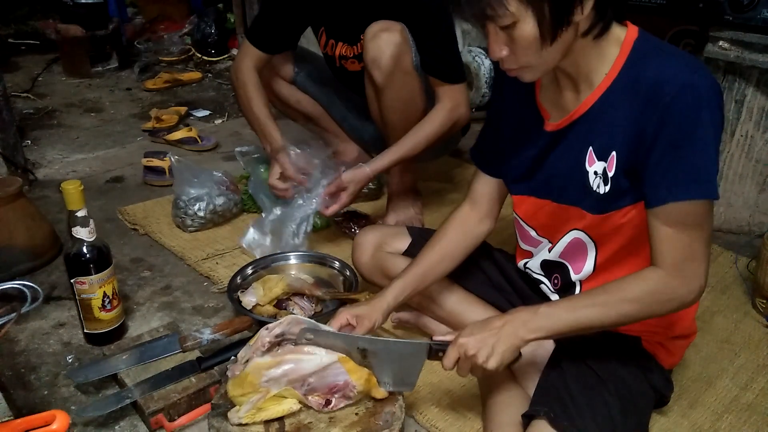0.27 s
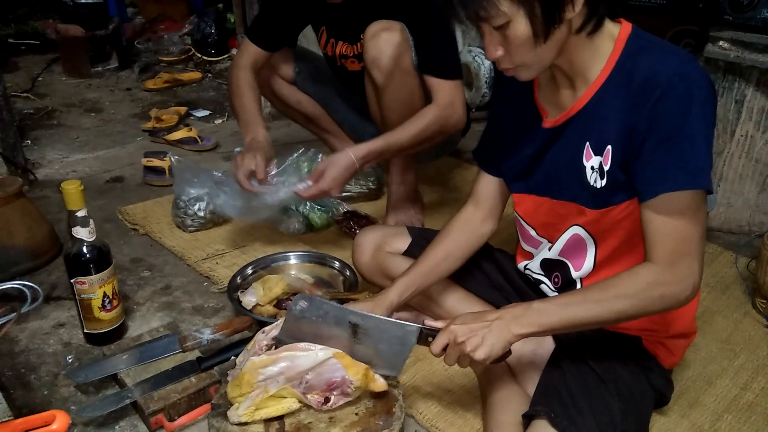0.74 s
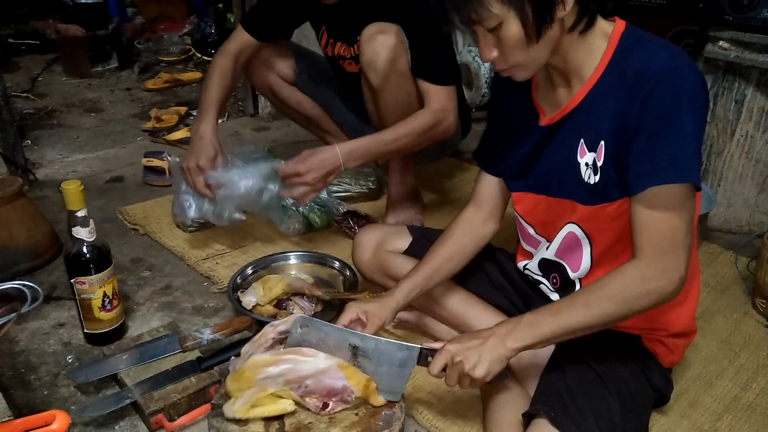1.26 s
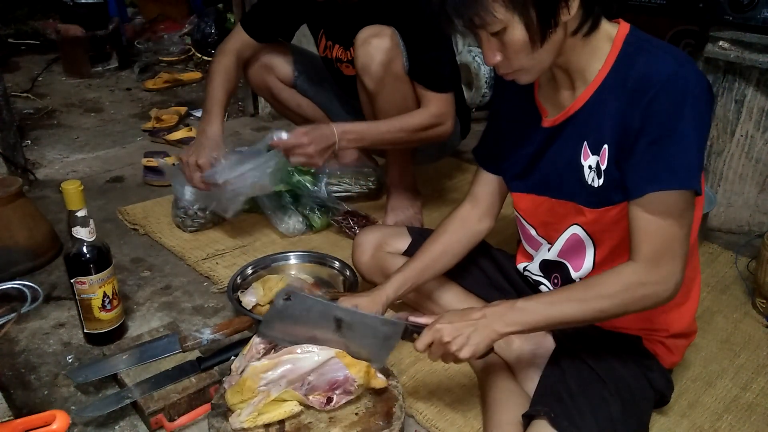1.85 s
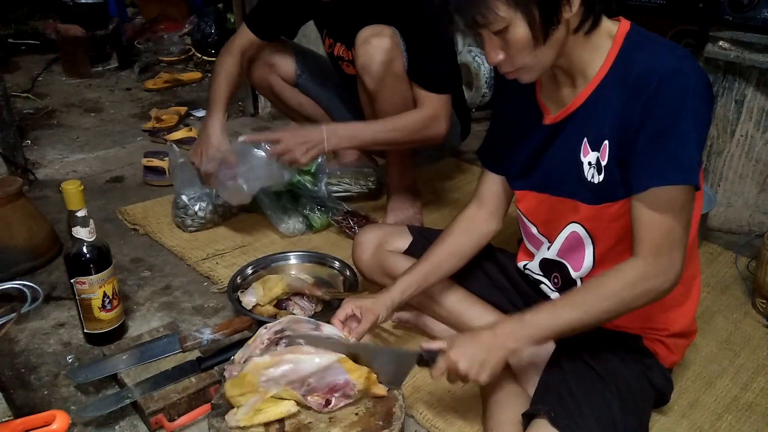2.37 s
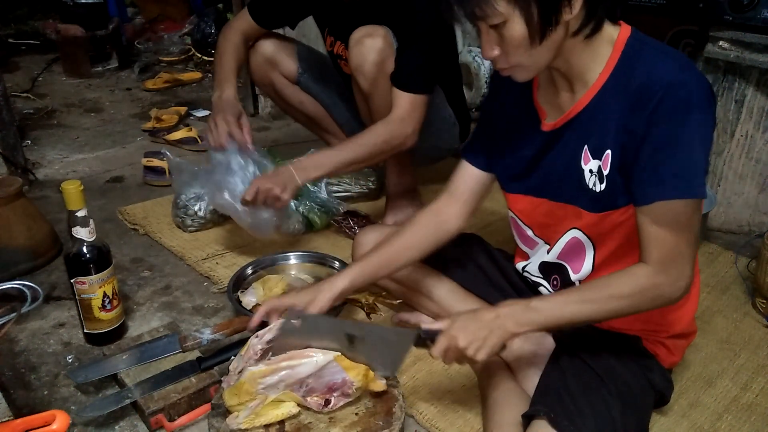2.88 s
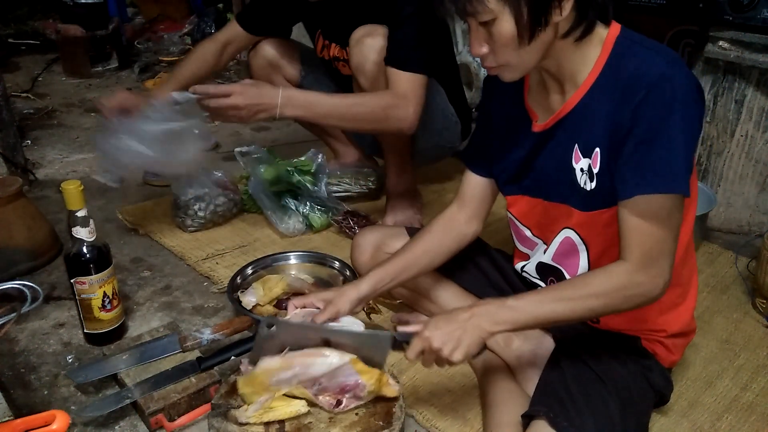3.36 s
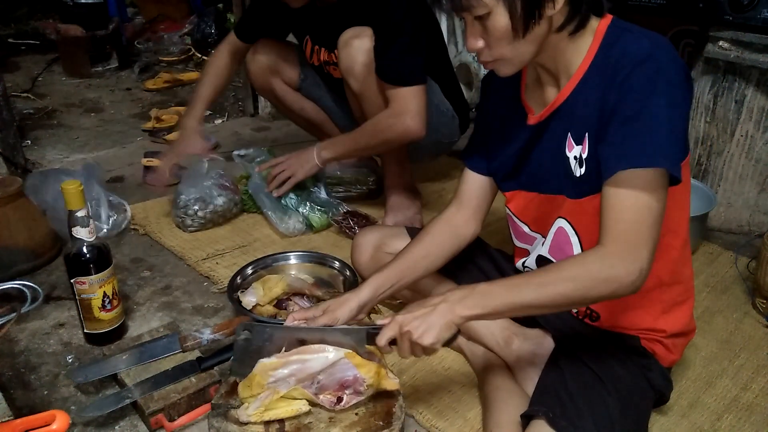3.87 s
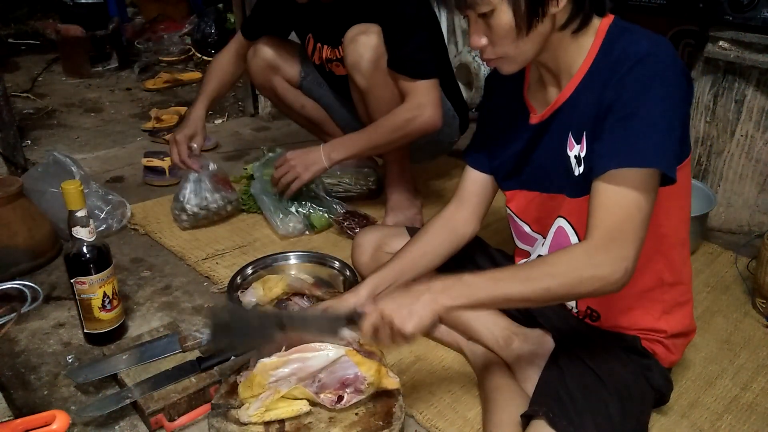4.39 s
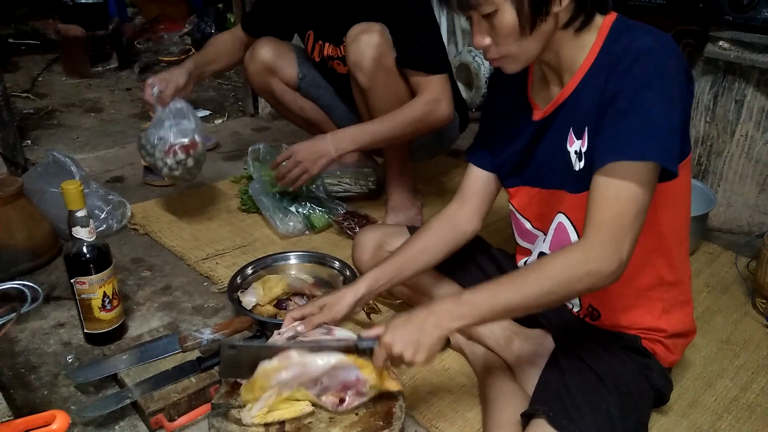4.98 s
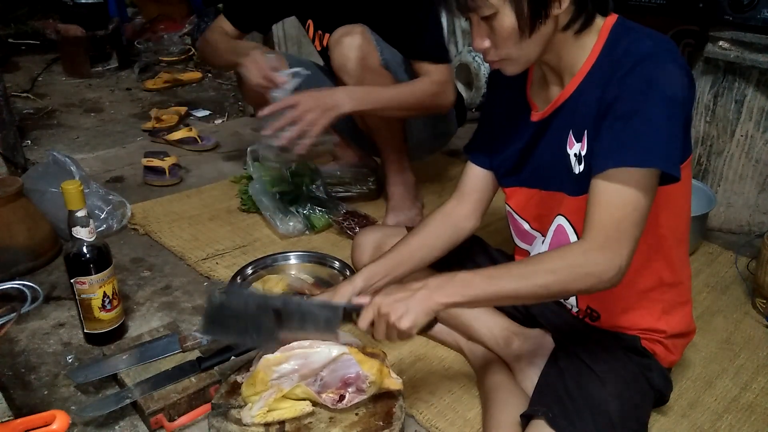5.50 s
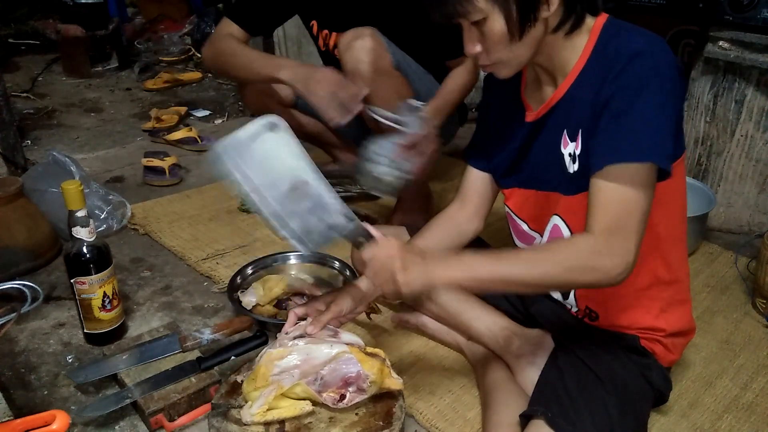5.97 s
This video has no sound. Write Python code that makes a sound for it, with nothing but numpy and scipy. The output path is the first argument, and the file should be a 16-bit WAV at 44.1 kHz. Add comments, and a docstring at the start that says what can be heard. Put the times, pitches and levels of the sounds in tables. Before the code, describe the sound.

A small, hard-walled room with short reflections, soft room tone and a low rumble that swells in over the first second. From 0 s thin plastic bags are pulled and gathered: airy, high hiss with fine crackle, busiest until about 1.1 s, with tiny ticks at 0.15 and 0.3 and soft floor bumps near 0.3. At 1.3 s a cleaver goes through raw chicken into a wooden block: deep thump, bright crack, short woody ring. A sharp little nudge at 2.0 precedes a second, knockier chop at 2.3, with a faint low hum passing until about 3. Bags rustle in brief pulls; a sharp crease ticks at 2.9 and steel clinks faintly at 3.2. Soft bumps come around 4.0. The loudest chop cracks and knocks hard at 4.87, followed by near stillness. Rustling returns from 5.4, with slight shifting at 5.9, then a final crunchy, less weighty double-catching chop at 6.2.

```python
"""In a small hard-walled room, a heavy cleaver chops a raw chicken four times on a wooden block.
Each chop layers a low push through the meat, a crack of skin and bone, and the edge knocking on ringing wood.
Behind it, thin plastic bags are pulled and gathered: dense random snaps make their hiss and crinkle.
Nudges, soft bumps, squeaks, a passing hum and one light clink fill in over low rumble and soft room tone."""
import sys
import numpy as np
from scipy import signal
from scipy.fft import rfft, irfft
from scipy.io import wavfile
from scipy.ndimage import uniform_filter1d

SR = 44100
rng = np.random.default_rng(int(sys.argv[2]) if len(sys.argv) > 2 else 0)


def materialize(psi):
    """Save the field psi as 16-bit PCM at rate SR to the path in sys.argv[1].

    A 1-D psi becomes a single channel; in a 2-D psi each row is a channel.
    """
    bounded = np.clip(np.atleast_2d(psi).T, -1, 1)
    quanta = np.round(bounded * 32767).astype(np.int16)
    wavfile.write(sys.argv[1], SR, quanta)


N = 275251  # length in samples

# Hands pulling or gathering a bag: (start [s], length [s], hiss of sliding film [dB], crumpling [dB])
GRIPS = [(0, 0.47, -53.5, -61.5), (0.526, 0.08, -45, -55), (0.592, 0.068, -43.5, -50.5),
         (0.673, 0.16, -47.5, -57), (0.827, 0.16, -42.5, -52), (0.971, 0.089, -43, -53),
         (1.193, 0.33, -50.5, -61.5), (1.656, 0.072, -53.5, -64), (1.939, .32, -47, -61.5),
         (2.34, 0.13, -51.5, -64.5), (2.741, 0.26, -50, -64), (3.037, 0.38, -52.5, -68.5),
         (3.295, 0.16, -49.5, -80), (3.672, 0.028, -60, -72.5), (3.811, 0.087, -48.5, -60.5),
         (3.92, 0.28, -55, -69), (4.168, 0.11, -47, -54.5), (4.287, 0.077, -47.5, -61.5),
         (4.362, 0.21, -59, -71.5), (5.449, 0.55, -53, -61), (5.879, 0.13, -54.5, -53.5)]
# The film tightens, more slowly in a long pull, then settles when the hand stops.
GRIP_RISE_SHARE, GRIP_RISE_MAX_S, GRIP_RELEASE_S = 0.38, 0.05, 0.027
# Faint rustle between grips, sinking almost to silence after the third chop, then returning:
# (time [s], hiss level [dB])
RUSTLE = [(0, -58.5), (.4, -55), (2.6, -56), (3.42, -63), (3.58, -67), (4.8, -63.5), (5.05, -96.5),
          (5.3, -91), (5.41, -63), (6.2, -64.5)]
RUSTLE_CRUMPLE_DB = -12.5  # its crumpling against its hiss
# Spectrum of film hissing: (frequency [Hz], level [dB])
HISS_SPECTRUM = [(500, -37.5), (2000, -25.5), (4500, -34.5), (6500, -17), (8000, -4), (9400, 2),
                 (10600, 0.5), (12200, -4), (14400, -7)]
# Spectrum of film folding: (frequency [Hz], level [dB])
CRUMPLE_SPECTRUM = [(100, -13.5), (200, -20.5), (290, -6.5), (400, -11.5), (750, -3.5), (1500, -0.5),
                    (2200, -2.5), (3000, -5.5), (4500, -6.5), (7000, -3.5), (14000, -23.5)]
# Single creases snapping above the hiss: (time [s], level [dB])
SNAPS = [(.1502, -22.5), (0.307, -25), (2.8866, -20.5)]

# Spectrum of the low rumble: (frequency [Hz], level [dB])
RUMBLE_SPECTRUM = [(20, -47), (35, -13), (50, 3), (85, -0.5), (120, -8), (180, -25.5), (600, -53)]
RUMBLE_IN_S = 1
# Spectrum of the surroundings: (frequency [Hz], level [dB])
ROOM_TONE_SPECTRUM = [(150, -13.5), (450, -4.5), (800, -3), (1300, -7), (2600, -22.5), (14000, -37)]
ROOM_TONE_DB = -73

# Meat, blade and bags shifted or set down: (time [s], level [dB], length [s], tilt [dB per octave])
NUDGES = [(.063, -55.5, 0.0037, -2), (.09, -61, 0.081, -3), (.3397, -53, 0.016, 2),
          (2.0222, -31.5, 0.0015, 4.5), (2.021, -47, 0.0093, -6.5), (2.9, -56.5, 0.041, 0),
          (3.8255, -52, 0.017, 0.5), (5.918, -48.5, 0.033, -4.5), (5.975, -52.5, 0.057, 2)]
# Spectrum of a nudge: (frequency [Hz], level [dB])
NUDGE_SPECTRUM = [(80, -8.5), (220, -11), (340, -4.5), (480, -15), (900, -2.5), (1500, -3.5), (2400, -6),
                  (5000, -30), (9500, -2.5), (14500, -13.5)]
# Soft bumps through the floor as the two people shift their weight: (time [s], level [dB])
BUMPS = [(0.265, -17), (0.361, -11), (3.979, -16.5), (4.144, -14)]
# Faint brief tones, perhaps squeaks of wet steel and film:
# (time [s], frequency [Hz], level [dB], length [s])
SQUEAKS = [(0.419, 1660, -52, 0.022), (2.531, 975, -69, 0.09), (4.642, 1634, -68.5, .13),
           (5.356, 1700, -74, 0.071)]

# Blows, the last chop catching twice; where the edge lands sets the clack's pitch:
# (time [s], thump into the floor [dB], body of the block [dB], body tilt [dB per octave],
#  knock of the edge [dB], ringing [dB], lead of the thump [s], clack [Hz], clack [dB])
CHOPS = [(1.2918, 10, 4, -9.5, 0.5, -43, 0.0048, 1630, -33),
         (2.296, 11, 5, -3.5, 11.5, -40.5, 0.0038, 1210, -33),
         (4.8693, 13, 20.5, 4, 25, -31, 0.0062, 1349, -15.5),
         (6.2061, -2, -8, -12, 9.5, -47, 0.0062, 1400, -28), (6.211, 1, -7, -17, 3, -44, 0.0066, 1490, -21)]
# Spectrum of a push into the floor: (frequency [Hz], level [dB])
THUMP_SPECTRUM = [(25, -45), (45, -9.5), (60, 0), (115, -0.5), (180, -5.5), (240, -26.5), (500, -40.5),
                  (2000, -72)]
# Spectrum of the block's body: (frequency [Hz], level [dB])
BODY_SPECTRUM = [(60, -37.5), (185, 1), (230, -8), (275, 3.5), (330, -2.5), (385, -17.5), (445, 2),
                 (520, -8.5), (600, 5), (720, -3.5), (1100, -23), (3000, -55.5)]
# Spectrum of the edge on wood: (frequency [Hz], level [dB])
KNOCK_SPECTRUM = [(200, -41), (650, -30), (790, -3.5), (900, 2.5), (1100, -9), (1400, -3), (2050, -9.5),
                  (2600, -30), (4000, -35.5), (14000, -50)]
CLACK_T60_S = 0.018
# Ringing modes of block and blade: (frequency [Hz], relative level [dB], t60 [s])
RING_MODES = [(277, -5, 0.27), (322.5, -7.5, 0.44), (450, -5.5, 0.3), (590, -1.5, 0.22), (755, -2.5, 0.31),
              (904, 8.5, .18), (936, 1.5, 0.18), (1023, -1.5, 0.16), (1234, -4.5, 0.15), (1338, -7.5, 0.15),
              (1398, -6.5, 0.14), (1500, -7.5, 0.13), (1635, -6, .15), (1674, -2, .19), (1806, -4, .12),
              (2087, -3.5, .16)]
BODY_TOP_HZ = 820  # lower modes belong to the mass of the block, higher ones answer the edge
FOCUS_DB, FOCUS_OCTAVES = 8.5, 0.15  # the place of the blow favours the modes near its clack
RING_ROUGH = 0.45  # share of unevenness, as meat and hand press on the ringing parts
# Skin and bone giving way: (time [s], level [dB], length [s], tilt [dB per octave])
CRACKS = [(1.2928, -27, 0.0042, -7), (2.2982, -22.5, 0.0069, -4), (4.8525, -39, 0.012, -9.5),
          (4.8656, -21, 0.0034, -5.5), (6.1915, -45, 0.0086, -4.5), (6.1963, -25.5, 0.0057, -5),
          (6.2005, -34, 0.0031, -7.5), (6.2055, -24.5, 0.011, -6.5)]
# Spectrum of a crack: (frequency [Hz], level [dB])
CRACK_SPECTRUM = [(300, -34), (650, -29.5), (950, -12.5), (1500, -19.5), (3200, -10.5), (4300, -11.5),
                  (6200, -8), (7800, -1.5), (9500, 7), (12000, -0.5), (14500, -5.5)]

HUM_HZ, HUM_DB = 86.3, -60.5
HUM_START_S, HUM_RISE_S, HUM_HOLD_S, HUM_FADE_DB_PER_S = 2.2, 0.12, 0.47, 38
CLINK_S = 3.1995
# Ringing of steel touched lightly once: (frequency [Hz], level [dB], t60 [s])
CLINK_PARTIALS = [(899, -56, .18), (1362, -51.5, .11), (2449, -58, .11)]

# Decay of the room: (frequency [Hz], t60 [s])
ROOM_DECAY = [(60, 0.61), (105, 0.52), (180, 0.31), (800, 0.3), (2000, 0.27), (5000, 0.25), (14000, 0.24)]
# Stereo width of the reflections: (frequency [Hz], side against mid [dB])
WIDTH = [(2700, -78), (4000, -41), (6000, -7), (8000, -2.5), (14000, -2)]
EDGE_HZ = 14350  # top of the final band


def gain(db):
    """Turn decibels into an amplitude factor."""
    return 10 ** (np.asarray(db) / 20)


def evened(x):
    """Scale to unit RMS level."""
    return x / np.sqrt(np.mean(x ** 2) + 1e-20)


def read_curve(points, hz):
    """Join the points with straight lines on a log-frequency axis."""
    f, value = np.transpose(points)
    return np.interp(np.log(hz + 1), np.log(f + 1), value)


def add(mix, s, sound):
    """Lay a sound into the mix at s seconds, cut at the end of the mix."""
    part = mix[round(s * SR):][:len(sound)]
    part += sound[:len(part)]


def pulse(points, tilt_db=0, from_hz=1000, size=8192):
    """The tightest causal click with the given spectrum (minimum phase), tilted above from_hz."""
    hz = np.fft.rfftfreq(size, 1 / SR)
    octaves = np.log2(np.maximum(hz / from_hz, 1))
    cepstrum = irfft(np.log(gain(read_curve(points, hz) + tilt_db * octaves)))
    # folding the cepstrum forward in time gathers the energy at the front
    cepstrum[1:size // 2] *= 2
    cepstrum[size // 2 + 1:] = 0
    return irfft(np.exp(rfft(cepstrum)))[:size // 2]


def unit_pulse(points, tilt_db=0):
    """A pulse scaled to unit energy."""
    click = pulse(points, tilt_db)
    return click / np.linalg.norm(click)


def colour(x, points):
    """Filter a sound to the given spectrum."""
    return signal.oaconvolve(x, pulse(points))[:len(x)]


def smooth(x, first, second):
    """Two moving averages along time, with lengths in samples."""
    return uniform_filter1d(uniform_filter1d(x, first), second)


def wander(size):
    """Slow random drift scaled to unit spread, with bounded swing, smoothed over about size samples."""
    return np.clip(evened(smooth(rng.standard_normal(N), size, size * 2 // 3)), -2, 2)


def ports(mid, side):
    """Two close microphone ports differ only in the treble."""
    return mid + np.array([[1], [-1]]) * colour(side, WIDTH)


def room(x, wet_db, build_s=0.0029):
    """Direct sound plus reflections that thicken quickly, each band dying at its own speed."""
    hz, t, z = signal.stft(rng.choice([-1., 1.], (2, SR // 2)), SR, nperseg=256)
    decay = gain(-60 * t / read_curve(ROOM_DECAY, hz)[:, None])
    tail = signal.istft(z * decay, SR, nperseg=256)[1]
    build = 1 - np.exp(-(np.arange(tail.shape[1]) / SR / build_s) ** 2)
    z = rfft(tail * build)
    # flatten the broad spectrum: the walls favour no band
    window = signal.windows.hann(64)[None]
    z /= np.sqrt(signal.convolve(abs(z) ** 2, window, "same", "direct"))
    keep = SR * 2 // 5
    tail = irfft(z)[:, :keep] * np.sqrt(build[:keep])
    tail /= np.linalg.norm(tail[0])
    mid, side = signal.oaconvolve(x[None], tail, axes=1)[:, :N] * gain(wet_db)
    return ports(x + mid, side)


def moving(x, wet_db, count=10, places_per_s=45):
    """A moving source crossfades through several sets of reflections in turn."""
    place = np.arange(N) / SR * places_per_s
    wet = 0
    for k in range(count):
        share = np.sin(np.pi / 2 * np.minimum((place - k) % count, 2)) ** 2
        wet = wet + room(x * share, wet_db, build_s=0.00083)
    return wet


def bursts(rows, spectrum, fall):
    """Each row is a quick run of tiny ruptures or slips that weakens toward its end."""
    out = np.zeros(N)
    for s, db, length, tilt_db in rows:
        u = np.linspace(0, 1, max(round(length * SR), 8))
        z = rfft(rng.standard_normal(len(u)) * np.exp(-fall * u), 2 * len(u))
        flat = irfft(z / abs(z))[:len(u)]  # the run has no pitch of its own
        run = evened(flat * signal.windows.tukey(len(u), .1))
        add(out, s, gain(db) * np.convolve(run, unit_pulse(spectrum, tilt_db)))
    return out


def grip(start, length):
    """Rise, hold and release of one hand movement."""
    t = np.arange(N) / SR - start
    rise = np.clip(t / min(GRIP_RISE_SHARE * length, GRIP_RISE_MAX_S), 0, 1)
    return rise * np.exp(-np.clip((t - length) / GRIP_RELEASE_S, 0, 20))


def crinkle(spectrum, level_db, per_s, spread_db, clump_db):
    """Thousands of little buckles in plastic film, of uneven size and coming in clumps."""
    size = gain(spread_db * np.minimum(rng.exponential(1, N), 5)) * rng.choice([-1, 1], N)
    happens = rng.random(N) < per_s / SR
    snaps = size * happens * gain(clump_db * wander(size=500))
    return evened(colour(snaps, spectrum)) * gain(level_db)


def facets(x, patch_db=1.65):
    """As the film folds, its facets change size, so its colour shifts in brief patches."""
    z = signal.stft(x, nperseg=256)[2]
    patches = rng.standard_normal(z.shape)
    for _ in range(2):
        patches = uniform_filter1d(patches, size=5, axis=0)  # across frequency
        patches = uniform_filter1d(patches, size=9, axis=1)  # across time
    return signal.istft(z * evened(gain(patch_db * evened(patches))), nperseg=256)[1][:N]


def bags():
    """Film sliding on film hisses; folding it crackles lower down. Every grip drives both."""
    slide = gain(np.interp(np.arange(N) / SR, *np.transpose(RUSTLE))) ** 2  # power
    fold = slide * gain(RUSTLE_CRUMPLE_DB) ** 2
    for start, length, hiss_db, crumple_db in GRIPS:
        power = grip(start, length) ** 2
        slide = slide + power * gain(hiss_db) ** 2
        fold = fold + power * gain(crumple_db) ** 2
    hiss = crinkle(HISS_SPECTRUM, 10 * np.log10(slide), per_s=5500, spread_db=2.8, clump_db=2.3)
    folds = crinkle(CRUMPLE_SPECTRUM, 10 * np.log10(fold), per_s=2000, spread_db=3.0, clump_db=2.0)
    return moving(facets(hiss + folds) + creases(), wet_db=2.5)


def rumble(level_db=-65.0, lump_db=4.2, swell_db=3.0):
    """Low-coloured noise, lumpy from quick and slow drifts in level, that swells in at the start."""
    drift_db = lump_db * wander(size=1500) + swell_db * wander(size=7000)
    noise = evened(colour(rng.standard_normal(N) * gain(drift_db), RUMBLE_SPECTRUM))
    swell_in = np.minimum(np.sqrt(np.arange(N) / SR / RUMBLE_IN_S), 1)
    return gain(level_db) * noise * swell_in


def room_tone():
    """A steady, soft wash of coloured noise, heard when the rustle sinks."""
    return gain(ROOM_TONE_DB) * evened(colour(rng.standard_normal(N), ROOM_TONE_SPECTRUM))


def handling():
    """Meat, blade and bags shift in short runs of slips."""
    return moving(bursts(NUDGES, NUDGE_SPECTRUM, fall=1.3), wet_db=4.0, count=4)


def creases():
    """A taut crease flips over with one sharp, bright tick."""
    out, tick = np.zeros(N), unit_pulse(HISS_SPECTRUM)
    for s, db in SNAPS:
        add(out, s, gain(db) * tick)
    return out


def bumps(tilt_db=4.0):
    """Light pushes excite the thump of the floor, with less weight than a chop."""
    out = np.zeros(N)
    for s, db in BUMPS:
        add(out, s, gain(db) * pulse(THUMP_SPECTRUM, tilt_db, from_hz=64))
    return room(out, wet_db=-0.5)


def squeaks(waver=0.015, sag=0.03):
    """Brief tones that start quickly, then sag, waver and break up as they fade."""
    out = np.zeros(N)
    for s, hz, db, length in SQUEAKS:
        u = np.linspace(0, 1, round(length * SR))
        drift, contact = uniform_filter1d(rng.standard_normal((2, len(u))), size=450, axis=1)
        pitch = hz * (1 + sag * (.5 - u) + waver * evened(drift))
        level = gain(db) * np.sin(np.pi * np.sqrt(u)) * evened(contact)
        add(out, s, level * np.sin(2 * np.pi * np.cumsum(pitch) / SR))
    return room(out, wet_db=-1)


def disperse(x, width_hz=800):
    """Bending waves of different pitch travel at different speeds, so a blow spreads over a few cycles."""
    r = np.exp(-np.pi * width_hz / SR)
    for hz in (850, 1350):
        poles = [1, -2 * r * np.cos(2 * np.pi * hz / SR), r * r]
        x = signal.lfilter(poles[::-1], poles, x)  # all-pass: delays without colouring
    return x


def ringing(t, body_db, ring_db, clack_hz, body_ring_db=-53, rise_s=0.0014):
    """Wood and blade ring in decaying modes, roughened by the uneven press of meat and hand."""
    hz, mode_db, t60 = np.transpose(RING_MODES)[:, :, None]
    favour_db = FOCUS_DB * np.exp(-(np.log2(hz / clack_hz) / FOCUS_OCTAVES) ** 2)
    drive_db = np.where(hz < BODY_TOP_HZ, body_db + body_ring_db, ring_db + favour_db)
    waves = np.sin(2 * np.pi * (hz * t + rng.random(hz.shape)))
    modes = gain(drive_db + mode_db - 60 * t / t60) * waves
    press = evened(smooth(rng.standard_normal(modes.shape), 600, 300))
    modes *= (1 + RING_ROUGH * press) / np.hypot(1, RING_ROUGH)
    return modes.sum(0) * (1 - np.exp(-t / rise_s))


def chops():
    """The meat passes a push to block and floor; then the edge lands with a clack and wood and blade ring."""
    thump, wood, ring = np.zeros((3, N))
    t = np.arange(SR // 2) / SR
    for s, thump_db, body_db, body_tilt_db, knock_db, ring_db, lead, clack_hz, clack_db in CHOPS:
        add(thump, s - lead, gain(thump_db) * pulse(THUMP_SPECTRUM))
        add(wood, s - lead, -gain(body_db) * pulse(BODY_SPECTRUM, body_tilt_db, from_hz=356))
        clack = gain(clack_db - 60 * t / CLACK_T60_S) * np.sin(2 * np.pi * clack_hz * t)
        add(wood, s, -disperse(clack))
        add(wood, s, -gain(knock_db) * disperse(pulse(KNOCK_SPECTRUM)))
        add(ring, s, ringing(t, body_db, ring_db, clack_hz))
    return room(thump, wet_db=5.5) + room(wood, wet_db=1.06) + ring


def cracks():
    """Skin and bone give way in short, bright runs of ruptures."""
    return moving(bursts(CRACKS, CRACK_SPECTRUM, fall=0.85), wet_db=-1.5, count=4)


def hum():
    """A low, uneven tone that swells, holds and fades, its two phases wandering separately."""
    t = np.arange(N) / SR - HUM_START_S
    fade_db = HUM_FADE_DB_PER_S * np.maximum(t - HUM_RISE_S - HUM_HOLD_S, 0)
    turn = 2 * np.pi * HUM_HZ * t
    tone = evened(wander(size=600) * np.sin(turn) + wander(size=600) * np.cos(turn))
    return np.clip(t / HUM_RISE_S, 0, 1) * gain(HUM_DB - fade_db) * tone


def clink():
    """Lightly touched steel rings in a few partials that die quickly."""
    out, t = np.zeros(N), np.arange(SR // 2) / SR
    for hz, db, t60 in CLINK_PARTIALS:
        add(out, CLINK_S, gain(db - 60 * t / t60) * np.sin(2 * np.pi * hz * t))
    return out


def scene():
    """The cleaver in front, bags behind, over the low rumble and room tone."""
    behind = bags() + rumble() + room_tone()
    small_sounds = handling() + bumps() + squeaks()
    return behind + small_sounds + chops() + cracks() + hum() + clink()


def record(dry):
    """The recorder's band limit: a steep low-pass at the top of the treble."""
    low_pass = signal.firwin(401, EDGE_HZ, window=("kaiser", 8), fs=SR)
    return signal.oaconvolve(dry, low_pass[None], "same")


dry = scene()
out = record(dry)
materialize(out)
```